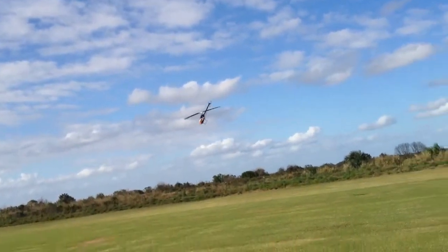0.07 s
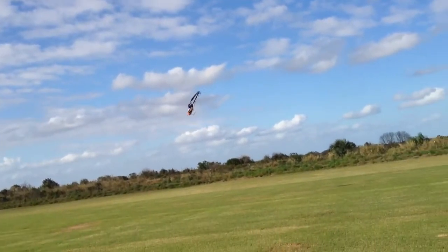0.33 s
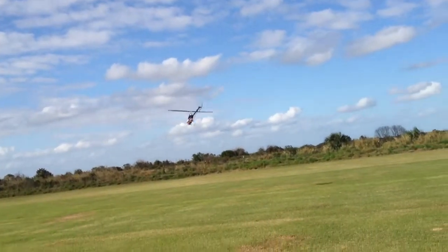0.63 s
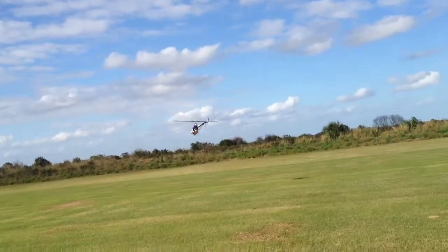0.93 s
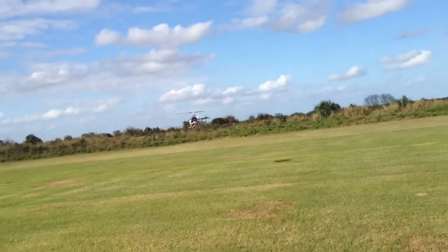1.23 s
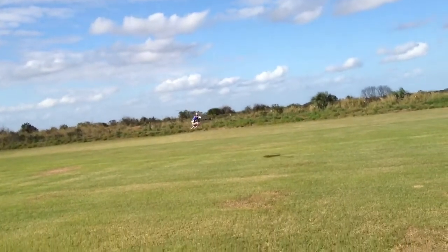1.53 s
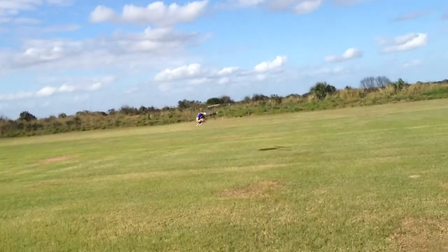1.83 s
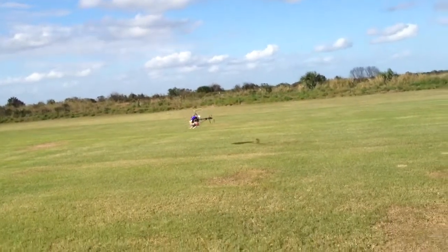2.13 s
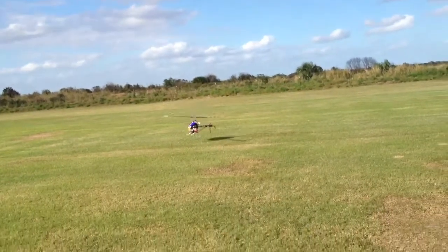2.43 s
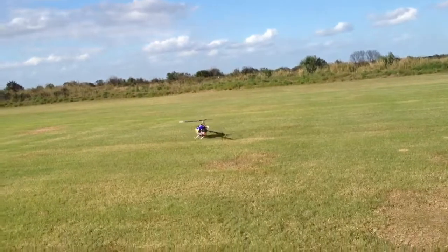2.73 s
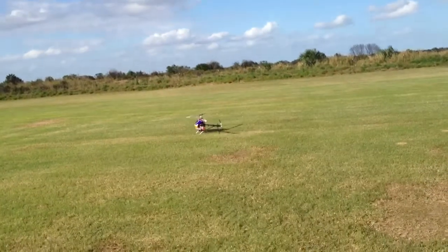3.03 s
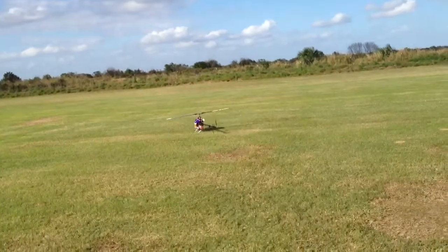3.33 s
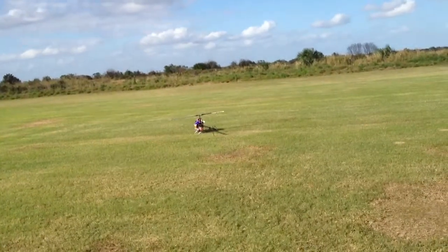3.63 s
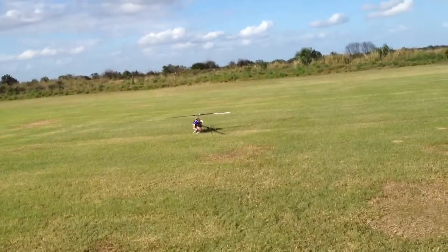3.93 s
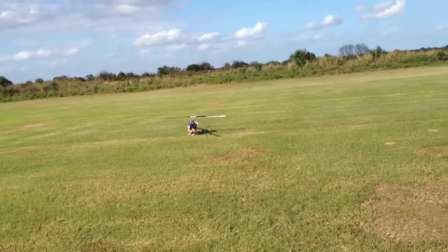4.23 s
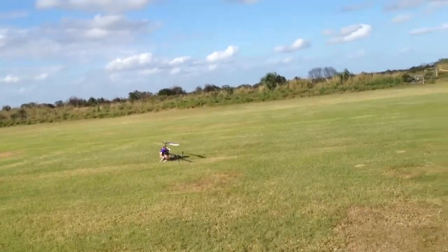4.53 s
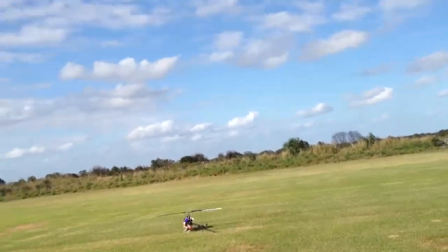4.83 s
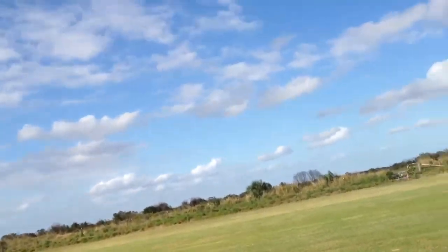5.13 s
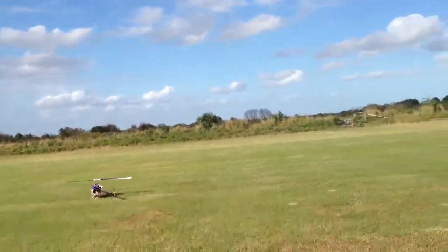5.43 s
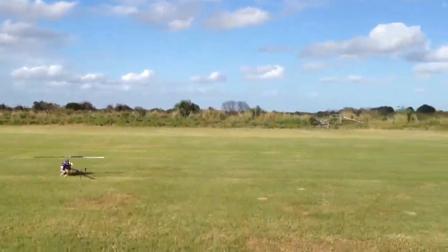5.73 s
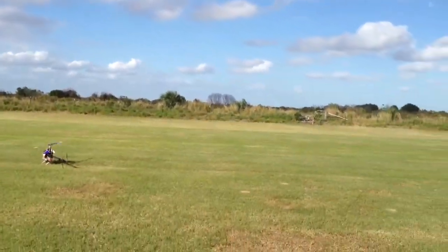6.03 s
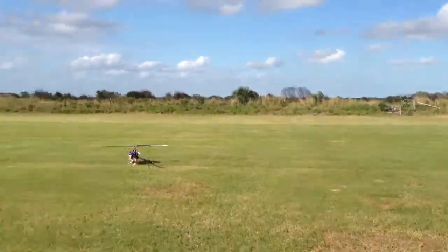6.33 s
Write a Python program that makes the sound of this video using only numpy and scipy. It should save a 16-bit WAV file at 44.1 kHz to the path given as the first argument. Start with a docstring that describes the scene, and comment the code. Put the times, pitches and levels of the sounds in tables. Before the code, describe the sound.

Outdoors in an open field, a model helicopter's blades whoosh and slap, then swish as its gear whine falls in pitch. Its small engine putters underneath, and wind thumps on the microphone. Air rushes over the grass as it lands, and the whine fades. A finger clicks and rubs on the microphone, briefly muffling everything. The engine's uneven, popping, metallic idle then stands out.

```python
"""A glow-engine model helicopter banks out of a turn, its blades slapping through their own wake, and
glides down over grass. The unpowered rotor swishes and its gears whine ever lower as it slows, while wind
buffets the microphone. Rotor wash sweeps the grass in the flare and it lands, the engine idling unevenly.
A finger knocks on the microphone, covers it for a moment and rubs past. Then the engine's rattle stands
out, each firing popping through the silencer and shaking the crankcase."""
import sys
import numpy as np
from scipy import signal
from scipy.fft import rfft, irfft, next_fast_len
from scipy.io import wavfile
from scipy.ndimage import uniform_filter1d

SR = 44100
rng = np.random.default_rng(int(sys.argv[2]) if len(sys.argv) > 2 else 0)


def output_pcm(signal):
    """Save a mono or channel-first signal as 16-bit PCM at the path in sys.argv[1].

    Samples are clipped to [-1, 1] before scaling.
    """
    pcm = np.clip(np.atleast_2d(signal).T, -1, 1) * 32767
    wavfile.write(sys.argv[1], SR, np.round(pcm).astype(np.int16))


N = 289781
TIME = np.arange(N) / SR


def from_db(db):
    """Decibels to gain."""
    return 10 ** (np.asarray(db) / 20)


def rms_one(x):
    """Scale to unit power."""
    return x / np.sqrt(np.mean(x ** 2) + 1e-20)


def in_time(rows):
    """Automation curves, one for each column after the time."""
    s, *columns = np.transpose(rows)
    return [np.interp(TIME, s, c) for c in columns]


def swells(rows):
    """An envelope of bell-shaped swells, summed in power."""
    return np.sqrt(sum(from_db(db) ** 2 * np.exp(-np.minimum(((TIME - s) / half) ** 2, 100))
                       for s, db, half in rows))


def cut(x, hz, kind, order=2):
    """Butterworth low- or high-pass."""
    return signal.sosfilt(signal.butter(order, min(hz, .45 * SR), kind, fs=SR, output="sos"), x + 1e-18)


def coloured(x, colour):
    """Shape a flat sound with an EQ curve, rms 1."""
    size = next_fast_len(N)
    hz, db = np.transpose(colour)
    gain = from_db(np.interp(np.log(np.fft.rfftfreq(size, 1 / SR) + 1), np.log(hz), db))
    return rms_one(irfft(rfft(x, size) * gain, size)[:N])


def noise(colour):
    """Noise shaped by an EQ curve, rms 1."""
    return coloured(rng.standard_normal(N), colour)


def drift(hz):
    """Random modulation up to about hz, with spread 1."""
    slow = cut(rng.standard_normal(N // 8 + 4002), 8 * hz, "low")[4000:]  # at an eighth of the rate
    return np.interp(np.arange(N) / 8, np.arange(len(slow)), rms_one(slow))


def resonate(x, resonances):
    """Parallel resonators of alternating polarity."""
    out = 0
    for k, (hz, width, db) in enumerate(resonances):
        r = np.exp(-np.pi * width / SR)
        poles = [1, -2 * r * np.cos(2 * np.pi * hz / SR), r * r]
        band = (1 - r * r) / 2 * signal.lfilter([1, 0, -1], poles, x + 1e-18)
        out = out + (-1) ** k * from_db(db) * band
    return out


def frayed(phase, width_hz):
    """A narrow band of noise riding on a tone, rms 1."""
    return (drift(width_hz) * np.cos(phase) + drift(width_hz) * np.sin(phase)) / np.sqrt(2)


def bursts(clicks, decay_s):
    """Each click sets off a dying burst of noise."""
    envelope = signal.lfilter([1], [1, -np.exp(-1 / (decay_s * SR))], clicks + 1e-18)
    return envelope * rng.standard_normal(N)


def rumble(colour):
    """Low noise with its level evened, so that the gust alone sets the strength."""
    x = noise(colour)
    return x / np.sqrt(uniform_filter1d(x ** 2, size=1000))


# The bed of breeze. Each row: time in seconds, level in dB.
BREEZE = [(0, -38.5), (.45, -41), (.85, -40), (1.08, -45), (1.8, -42.5), (2.14, -36.5), (2.65, -38.5),
          (2.9, -35.5), (3.15, -38.5), (3.5, -42.5), (3.85, -50), (4.27, -37.5), (4.4, -49.5), (5.1, -55.5),
          (6.57, -52)]
# The strongest buffets. Each row: crest in seconds, level in dB, half length in seconds.
BUFFETS = [(.155, -30.5, 0.017), (.247, -33, 0.0074), (.405, -35, 0.018), (.555, -36.5, 0.012),
           (.683, -35, 0.0053), (.755, -31, 0.0054), (1.93, -28, 0.0096), (2.04, -31.5, 0.012),
           (2.138, -31, 0.019), (2.21, -32, 0.0058), (2.29, -40, 0.0048), (2.42, -29, 0.0055),
           (2.54, -33.5, 0.0089), (2.708, -31.5, 0.0063), (2.86, -28, 0.006), (2.94, -35, 0.019),
           (3.19, -33, 0.014), (3.425, -34.5, 0.011), (4.08, -40.5, 0.012), (4.29, -31, 0.018),
           (4.512, -33, 0.005), (4.738, -35, 0.019), (4.855, -37.5, 0.014), (4.998, -29.5, 0.013),
           (5.18, -44.5, 0.014), (5.245, -39, 0.0087), (5.338, -35, 0.016), (5.425, -39.5, .018),
           (5.641, -34.5, 0.012), (5.84, -42.5, 0.011), (5.93, -42.5, 0.031), (5.979, -34.5, 0.0044),
           (6.145, -37.5, 0.015), (6.48, -41.5, 0.041)]
# EQ of the wind, and of a buffet in a lull. Each row: frequency in Hz, gain in dB.
WIND_COLOUR = [(20, -44), (45, -57), (70, -23.5), (110, -8), (170, 0.5), (240, -2.5), (340, -8.5),
               (500, -17.5), (800, -37), (1500, -48), (4000, -66)]
BUFFET_COLOUR = [(20, -32), (45, -29), (70, -16.5), (110, 3.5), (170, 8), (240, 2.5), (340, -13.5),
                 (500, -26), (800, -23), (1500, -68), (4000, -72)]


def wind(lumpy_hz=26, lumpy_db=1.8, calm_db=-46.5, eddy_db=-14, strong_db=-34):
    """Turbulence thumps on the microphone; strong gusts shed brighter eddies, lulls have dull buffets."""
    breeze_db, = in_time(BREEZE)
    calm = 1 / (1 + from_db(breeze_db - calm_db) ** 2)
    buffets = swells(BUFFETS)
    force = np.hypot(from_db(breeze_db + lumpy_db * drift(lumpy_hz)), np.sqrt(1 - calm) * buffets)
    eddies = rms_one(cut(cut(rng.standard_normal(N), 300, "high"), 700, "low", order=3))
    eddy_gain = from_db(eddy_db) * np.sqrt(force / from_db(strong_db))
    flow = force * (rumble(WIND_COLOUR) + eddy_gain * eddies)
    return flow + np.sqrt(calm) * buffets * rumble(BUFFET_COLOUR)


# Rough rips of wind. Each row: centre in seconds, level in dB, half length in seconds.
TEARS = [(2.781, -37, 0.0023), (2.795, -38, .006), (2.895, -38, .005), (2.923, -33, .003),
         (2.934, -40.5, 0.0054), (2.955, -37, .004), (3.06, -39, 0.0045), (3.105, -40, 0.015),
         (3.145, -40, 0.0054)]
# Their EQ. Each row: frequency in Hz, gain in dB.
TEAR_COLOUR = [(200, -2), (450, 9), (950, 1), (1500, -15), (2500, -21), (5000, -41)]
# Wind pops. Each row: time in seconds, peak in dB before the low cut.
POPS = [(2.108, -17.5), (2.333, -18.5), (2.78, -22), (2.921, -28)]


def gusts(pop_hz=500):
    """Gusts tear and pop at the microphone port."""
    pops = sum(from_db(db) * np.exp(-np.minimum(np.abs(TIME - s) * 2 * np.pi * pop_hz, 100))
               for s, db in POPS)
    return swells(TEARS) * noise(TEAR_COLOUR) - cut(pops, 150, "high")


# Finger rubs, light slides of dry skin and palm brushes.
# Each row: centre in seconds, level in dB, half length in seconds.
RUBS = [(4.22, -58, 0.063), (4.446, -43, 0.0046), (4.457, -39.5, 0.0068), (4.462, -54, 0.028),
        (4.71, -65, 0.023), (4.841, -46.5, 0.003), (4.95, -60, 0.027), (5.137, -50, 0.012),
        (5.18, -60.5, 0.1)]
SLIDES = [(4.458, -56, 0.011), (4.71, -61.5, 0.15), (4.84, -39, 0.0013), (4.89, -58.5, 0.061),
          (5.15, -67, 0.1)]
BRUSHES = [(4.69, -60, 0.034), (4.96, -64, 0.021), (5.19, -62, 0.03), (5.275, -59.5, 0.031),
           (5.42, -64.5, 0.04)]
# Their EQs. Each row: frequency in Hz, gain in dB.
RUB_COLOUR = [(150, -2), (500, 4.5), (1200, 0.5), (2300, 3), (3400, -1.5), (4500, -6.5), (7000, -5.5),
              (10000, -16), (15000, -34)]
SLIDE_COLOUR = [(1500, -16), (4000, -7), (8000, 9.5), (11000, 5), (15000, 2)]
BRUSH_COLOUR = [(700, -22), (1500, -6), (2500, -1.5), (3600, 4), (4600, -13), (8000, -23)]


def rubbing(grain_db=4.0):
    """Skin drags across the microphone housing: grainy fingers, a smooth palm."""
    fingers = swells(RUBS) * noise(RUB_COLOUR) + swells(SLIDES) * noise(SLIDE_COLOUR)
    return fingers * from_db(grain_db * drift(620)) + swells(BRUSHES) * noise(BRUSH_COLOUR)


# Modes of the microphone housing. Each row: frequency in Hz, gain in dB, 60 dB decay time in seconds.
HOUSING = [(605, -18.5, 0.0096), (1500, -33, 0.0035), (2850, -1, 0.0015), (5300, -4, 0.002),
           (6800, -11.5, 0.0053), (8900, -12.5, 0.0022), (10900, -12, 0.0046)]
# Finger knocks. Each row: start in seconds, gain in dB, high cut of the soft contact in Hz, low cut
# in Hz, pitch of the hollow under the hand in Hz, echo delay off the hand in seconds, signed echo gain.
KNOCKS = [(4.1933, -20, 2430, 1700, 2540, 0.00093, 0.68), (4.2524, -21, 7000, 2010, 2680, 0.00029, .25),
          (4.317, 0.5, 6000, 2130, 2180, 0.00049, 0.26), (4.3173, -12.5, 690, 400, 574, 0.0017, 0.23),
          (4.4317, -12, 9400, 2040, 2900, 0.00045, -0.39), (4.4318, -9.5, 1690, 897, 1420, 0.0004, -0.36),
          (4.8394, -27.5, 12000, 1000, 6700, 0.0011, -0.62), (4.837, -36, 2400, 706, 1550, 0.00093, -0.43),
          (5.1374, -21, 2104, 1215, 1950, .00076, -0.36), (5.138, -19.5, 1010, 724, 860, 0.00059, -0.44),
          (5.164, -28, 2300, 600, 1610, 0.00066, -0.74)]


def knocks(hollow_db=-2, hollow_cycles=8.5):
    """Knocks ring the small, well damped housing and the hollow under the hand."""
    out = np.zeros(N)
    age = TIME[:SR // 20]
    for s, db, soft_hz, low_hz, hollow_hz, echo_s, echo_gain in KNOCKS:
        modes = list(HOUSING) + [(hollow_hz, hollow_db, hollow_cycles / hollow_hz)]
        ring = sum(from_db(mode_db + rng.standard_normal() - 60 * age / t60)
                   * np.sin(2 * np.pi * hz * age) for hz, mode_db, t60 in modes)
        ring = ring + echo_gain * np.interp(age - echo_s, age, ring, left=0)
        knock = cut(cut(ring, soft_hz, "low"), low_hz, "high", order=1)
        start = int(s * SR)
        out[start:start + len(age)] += from_db(db) * knock
    return out


def under_finger(x, from_s=4.319, to_s=4.431, muffled_db=-8, muffle_hz=3500):
    """While the finger lies on the port, the field sounds faint and dull."""
    covered = uniform_filter1d(1. * ((TIME > from_s) & (TIME < to_s)), size=150)
    return (1 - covered) * x + covered * from_db(muffled_db) * cut(x, muffle_hz, "low", order=1)


# Waves of rotor wash. Each row: centre in seconds, level in dB, half length in seconds.
WASH = [(2.124, -39.5, 0.25), (2.12, -38.5, 0.046), (2.87, -43.5, 0.19), (3.2, -42, 0.062)]
# Their EQ. Each row: frequency in Hz, gain in dB.
WASH_COLOUR = [(100, -27), (250, 5), (380, 0.5), (550, -8), (900, -16), (2500, -40.5)]


def rotor_wash(churn_db=2):
    """Air from the rotor churns over the grass in the flare."""
    return swells(WASH) * from_db(churn_db * drift(55)) * noise(WASH_COLOUR)


# The opening whoosh. Each row: centre in seconds, level in dB, half length in seconds.
RUSH = [(.135, -45, 0.073)]
# Its EQ. Each row: frequency in Hz, gain in dB.
RUSH_COLOUR = [(400, -12), (900, -6), (1500, 5), (2400, -3), (3400, -8), (4300, -17), (8000, -31)]


def disc_rush():
    """The whole rotor disc rushes as it banks out of the turn."""
    return swells(RUSH) * noise(RUSH_COLOUR)


# Bouts of slapping, and the hardest single slaps.
# Each row: centre in seconds, level in dB, half length in seconds.
SLAP_BOUTS = [(.135, -46, 0.062), (.44, -47.5, .11), (.6, -55, 0.067), (.79, -54, 0.073)]
HARD_SLAPS = [(.101, -46, 0.002), (.311, -33, 0.0018), (.425, -38, 0.003)]
# EQ of a slap. Each row: frequency in Hz, gain in dB.
SLAP_COLOUR = [(150, -2), (500, 9.5), (850, 14), (1200, -1), (1400, 13), (1850, 4), (2200, 2.5), (3200, -4),
               (4200, -12), (9000, -28)]
# The hollow body of a hard slap. Each row: frequency in Hz, width in Hz, gain in dB.
THWACK = [(750, 110, 0)]


def blade_slaps(blade, bed_db, sharpness=4, wake_at_cycle=.65):
    """The blades cut through their own wake, one pulse of noise a pass."""
    passes = rms_one(np.exp(sharpness * np.cos(blade - 2 * np.pi * wake_at_cycle)))
    slaps = np.hypot(from_db(bed_db), swells(SLAP_BOUTS)) * passes * noise(SLAP_COLOUR)
    thwacks = swells(HARD_SLAPS) * rms_one(resonate(rng.standard_normal(N), THWACK))
    return slaps + thwacks


def gear_whirr(blade, overtones=260, size=8192, spread_db=7):
    """Uneven teeth repeat with every blade pass: a thicket of overtones, a few of which stand out."""
    out = 0
    for mesh in range(2):
        strengths = from_db(spread_db * np.minimum(rng.standard_normal(overtones), 2))
        phases = np.exp(2j * np.pi * rng.random(overtones))
        cycle = irfft(np.append(0, strengths * phases), size)
        out = out + drift(2.87) * np.interp(blade / (2 * np.pi) % 1, np.arange(size) / size, cycle)
    return rms_one(out / np.sqrt(uniform_filter1d(out ** 2, size=4000)))


# Fader of the gear hiss. Each row: time in seconds, level in dB.
GEAR_HISS = [(0, -59), (2.0, -58.5), (2.92, -57), (3.15, -62.5), (3.45, -60), (3.58, -57), (3.75, -61.5),
             (4.1, -63), (5.1, -68.5), (6.57, -67.5)]
# Its EQ. Each row: frequency in Hz, gain in dB.
GEAR_COLOUR = [(2000, -39), (3600, -3), (4050, -19), (4500, 1.5), (5300, 1), (5900, -11), (6800, 9),
               (8200, 10), (9500, 1), (10800, 4), (12300, 7.5), (13400, -3.5), (15000, -5.5)]
# Resonances of the frame. Each row: frequency in Hz, width in Hz, gain in dB.
FRAME = [(2040, 150, -15), (2550, 71, 7), (3167, 55, 10), (3800, 140, 4), (4255, 70, -5), (4784, 69, 11),
         (6600, 230, 8), (7550, 130, -1), (10350, 200, -0.5), (10800, 270, 2.5), (12600, 400, -2)]


def gear_hiss(blade, drive, chop_db=1.0, flutter_db=1.5, frame_db=-5):
    """The running gears hiss and ring the frame, pulsing with each blade pass."""
    level_db, = in_time(GEAR_HISS)
    chop = np.cos(blade) + np.cos(2 * blade)
    frame = from_db(frame_db) * rms_one(resonate(rng.standard_normal(N), FRAME))
    gain = from_db(level_db + chop_db * chop + flutter_db * drift(73))
    return gain * (coloured(drive, GEAR_COLOUR) + frame)


# Where the whine sings out. Each row: centre in seconds, level in dB, half length in seconds.
WHINE_SWELLS = [(.36, -53.5, 0.16), (.9, -44.5, 0.085), (1.14, -42, 0.17), (1.3, -44.5, 0.098),
                (1.57, -50.5, 0.09), (1.77, -45, 0.089), (2.28, -53.5, 0.19), (2.72, -73, 0.1)]
# Higher gear tones. Each row: ratio to the whine, level in dB, centre in seconds, half length in seconds.
GEAR_TONES = [(1.999, -57.5, 2.28, 0.3), (2.621, -62, 1.54, 0.28), (2.826, -65, 1.8, 0.34),
              (3.269, -69, 1.06, 0.18), (3.279, -62, 2.44, 0.25), (3.86, -72, 1.6, 0.23),
              (3.916, -63, 1.43, 0.19), (3.889, -56, 2.115, 0.099), (3.998, -61, 2.27, 0.063),
              (4.648, -79, 0.98, 0.35)]


def gear_whine(phase, blade, flutter_db=1.0, throb=.35, breath=.48, breath_hz=120, tone_width_hz=26):
    """The whine throbs with each blade pass, and turbulence frays it into a breathy band."""
    gain = from_db(flutter_db * drift(57)) * (1 + throb * np.cos(blade))
    whine = gain * np.sqrt(2) * np.sin(phase) + breath * frayed(phase, breath_hz)
    tones = sum(swells([(s, db, half)]) * frayed(ratio * phase, tone_width_hz)
                for ratio, db, s, half in GEAR_TONES)
    return swells(WHINE_SWELLS) * whine + tones


def rotor_speed(brake_at_s=.66, glide_loss_per_s=.061, brake_loss_per_s=.178):
    """Share of the starting speed; drag bites harder once the blades pitch up to brake the descent."""
    loss = np.where(TIME < brake_at_s, glide_loss_per_s, brake_loss_per_s)
    return np.exp(-np.cumsum(loss) / SR)


# Blade load, high in the turn and flare, gone after touchdown. Each row: time in seconds, gain in dB.
BLADE_LOAD = [(0, 5.5), (.11, 6.5), (.25, 1), (.5, 1), (.75, 2.5), (1.95, 1.2), (2.4, 4.5), (2.95, 2.5),
              (3.4, -3), (4.1, -3), (6.57, -5.5)]
# EQ of the swish. Each row: frequency in Hz, gain in dB.
SWISH_COLOUR = [(150, -4), (400, -10), (750, 10), (1050, 7), (1300, 0.5), (2100, 1), (2700, -1), (3500, -8),
                (4100, -12), (4700, -13), (6000, -15), (12000, -46)]
# Narrow dips and small peaks that give the hiss a hollow colour.
# Each row: frequency in Hz, width in Hz, gain in dB of the band, taken away and added in turn.
HOLLOW_COLOUR = [(1280, 180, -5), (2210, 61, -16), (2910, 106, -3.5), (3350, 97, -7), (6030, 400, -6)]


def rotor(start_hz=1146.4, whine_per_blade=21.2, waver=.00151, whirr_share=.3,
          swish_db=-50, slap_db=-57.5, flutter_db=1.5):
    """Blades and gears run down in step: the whine falls, and slap fades faster than swish."""
    speed = rotor_speed()
    speed_db = 20 * np.log10(speed)
    load_db, = in_time(BLADE_LOAD)
    phase = 2 * np.pi * np.cumsum(start_hz * speed * (1 + waver * drift(34.4))) / SR
    blade = phase / whine_per_blade  # one cycle a blade pass
    drive = np.sqrt(whirr_share) * gear_whirr(blade) + np.sqrt(1 - whirr_share) * rng.standard_normal(N)
    swish_gain = from_db(swish_db + load_db + speed_db + flutter_db * drift(41))
    slaps = blade_slaps(blade, slap_db + load_db + 2.5 * speed_db)
    rush = disc_rush()
    hiss = swish_gain * coloured(drive, SWISH_COLOUR) + gear_hiss(blade, drive)
    return hiss - resonate(hiss, HOLLOW_COLOUR) + rush + slaps + gear_whine(phase, blade)


# Accents in the idle. Each row: time in seconds, strength in dB (ordinary_db is a normal firing).
HARD_FIRINGS = [(3.517, -36), (3.577, -33), (3.636, -34.5), (3.696, -35), (3.764, -38.5), (3.828, -35.5),
                (3.903, -34.5), (3.962, -36.5), (4.023, -34.5), (4.067, -35.5), (4.111, -34), (4.954, -32),
                (5.040, -37), (5.069, -39), (5.084, -36), (5.157, -35), (5.322, -33), (5.561, -39.5),
                (5.605, -37.5), (5.678, -38.5), (5.768, -38.5), (5.813, -40), (5.843, -39), (5.9178, -35),
                (5.977, -34.5), (6.036, -40.5), (6.066, -39.5), (6.11, -38.5), (6.196, -39), (6.24, -38.5),
                (6.285, -41), (6.329, -38), (6.372, -36), (6.444, -36), (6.531, -37.5)]


def firings(per_s, ordinary_db=-43, uneven_db=1.6, alternate_db=1.44, spent_db=-2, jitter_s=.00015):
    """One click a turn: the rich idle burns strong, then weak; a hard firing leaves the next spent."""
    turns = np.cumsum(per_s) / SR
    hard_s, hard_db = np.transpose(HARD_FIRINGS)
    anchor_s = np.concatenate([[0], hard_s, [TIME[-1]]])
    turns_between = np.round(np.diff(np.interp(anchor_s, TIME, turns)))
    anchor_turn = np.concatenate([[0], np.cumsum(turns_between)]).astype(int)
    turn = np.arange(anchor_turn[-1])
    timing, burn = rng.standard_normal((N // 100, 2))[turn].T
    when = np.interp(turn, anchor_turn, anchor_s) + jitter_s * timing
    since_hard = turn - anchor_turn[np.searchsorted(anchor_turn, turn, side="right") - 1]
    force_db = uneven_db * np.minimum(burn, 1) + alternate_db * (-1) ** since_hard
    force_db += spent_db * (since_hard == 1)
    force_db[anchor_turn[1:-1]] = hard_db - ordinary_db
    clicks = np.zeros(N)
    clicks[np.clip((when * SR).astype(int), 0, N - 1)] = from_db(force_db)
    return clicks


# Resonances of the silencer, of its bark on a hard firing, and of the low pipe.
# Each row: frequency in Hz, width in Hz, gain in dB.
SILENCER = [(378, 55, 3.5), (662, 67, -4.5), (854, 73, 2.5), (1044, 74, -2.5)]
BARK = [(952, 73, 0)]
PIPE = [(144, 44, -7), (273.4, 10.5, 4.5), (408, 13, -4.5)]


def exhaust(clicks, excess, puff_s=.0023, puff_share=.07, cut_hz=1250, bark_db=-9, hum_db=-4):
    """Firings pop through the silencer, the hotter gas of hard ones barks higher, and the pipe hums."""
    gas = clicks - .5 * excess
    pops = cut(resonate(gas + puff_share * bursts(gas, puff_s), SILENCER), cut_hz, "low", order=4)
    barks = cut(resonate(excess, BARK), cut_hz, "low", order=4)
    strokes = 1. * (clicks > 0)  # every turn pumps the same gas, however it burns
    hum = cut(resonate(strokes, PIPE), cut_hz, "low")
    return rms_one(pops) - from_db(bark_db) * rms_one(barks) + from_db(hum_db) * rms_one(hum)


# The crankcase's rings, and its broad crack. Each row: frequency in Hz, width in Hz, gain in dB.
METAL = [(2540, 65, -11), (2940, 110, -7.5), (3060, 40, -1), (3435, 34, -2.5), (4258, 82, 3),
         (4530, 140, -5.5), (5600, 74, -2), (5950, 72, 2), (6100, 55, 0), (7430, 75, -6.5), (7630, 87, -1),
         (8790, 130, -7), (9960, 370, -16), (12700, 2000, -38), (14400, 700, -19.5)]
CRACK = [(1650, 230, -12), (5760, 800, 4), (8600, 820, -1.5), (12600, 4700, -11)]


def crankcase(clicks, excess, shakes, clack_db=2, part_spread_db=1.5, crack_s=.0021, crack_db=-10):
    """Each firing shakes every metal part differently; hard ones crack through the whole case."""
    blows = rms_one(shakes) + from_db(clack_db) * rms_one(clicks)
    metal = sum((-1) ** k * resonate(blows * from_db(part_spread_db * drift(40)), [part])
                for k, part in enumerate(METAL))
    cracks = resonate(bursts(excess, crack_s), CRACK)
    return rms_one(metal) + from_db(crack_db) * rms_one(cracks)


# Buzz in the descent and at touchdown. Each row: centre in seconds, level in dB, half length in seconds.
BUZZ = [(1.6, -60.5, 0.65), (2.7, -58, 0.48), (3.85, -65.5, 0.31)]
# Resonances of skids and boom. Each row: frequency in Hz, width in Hz, gain in dB.
SKIDS = [(3097, 49, 4.5), (3630, 51, 4), (4350, 120, 0.5), (7600, 1100, -8.5), (11300, 1700, -14)]


def skid_buzz(shakes):
    """Skids and boom buzz along with the firings."""
    return swells(BUZZ) * rms_one(resonate(shakes, SKIDS))


# The idle. Each row: time in seconds, firings per second, exhaust level in dB, rattle level in dB.
ENGINE = [(0, 67, -53, -68), (1.15, 66.4, -48.5, -65), (1.7, 66.2, -50.5, -73), (3.2, 65.5, -53.5, -68.5),
          (4.15, 67.3, -53.5, -76), (4.55, 67.3, -64, -62.5), (5.0, 67.5, -61.5, -59),
          (5.38, 67.5, -57.5, -60), (5.9, 67.6, -56, -56.5), (6.57, 68.4, -56, -60.5)]


def engine(hard_above_db=.5, shake_s=.0026):
    """One train of firings drives the exhaust, the crankcase rattle and the skids."""
    per_s, exhaust_db, rattle_db = in_time(ENGINE)
    clicks = firings(per_s)
    excess = np.maximum(clicks - from_db(hard_above_db), 0)  # the extra force of harder firings
    shakes = bursts(clicks, shake_s)
    pops = from_db(exhaust_db) * exhaust(clicks, excess)
    rattle = from_db(rattle_db) * crankcase(clicks, excess, shakes)
    return pops + rattle + skid_buzz(shakes)


def scene():
    """Helicopter and wind in the open, with the finger right at the microphone; mono."""
    field = rotor_wash() + engine() + rotor() + wind() + gusts()
    return (under_finger(field + rubbing()) + knocks())[None, :]


def record(dry, notch_hz=4160, notch_width_hz=240, low_cut_hz=55, ceiling=.85, high_cut_hz=15350):
    """A narrow dip near 4 kHz hollows the sound; the microphone loses deep bass and top, rounds peaks."""
    notched = dry - resonate(dry, [(notch_hz, notch_width_hz, -4.5)])
    rounded = ceiling * np.tanh(cut(notched, low_cut_hz, "high") / ceiling)
    return signal.sosfilt(signal.ellip(10, .1, 70, high_cut_hz, fs=SR, output="sos"), rounded)


dry = scene()
out = record(dry)
output_pcm(out)
```